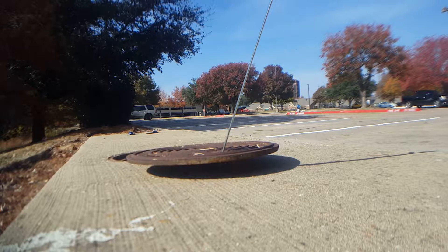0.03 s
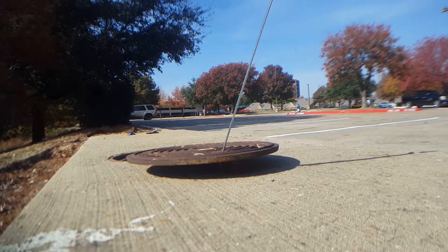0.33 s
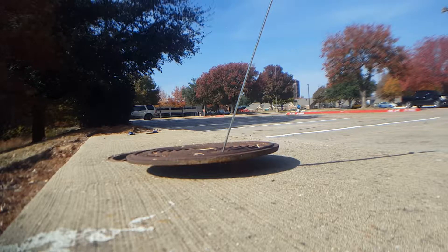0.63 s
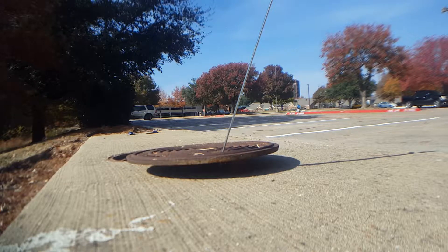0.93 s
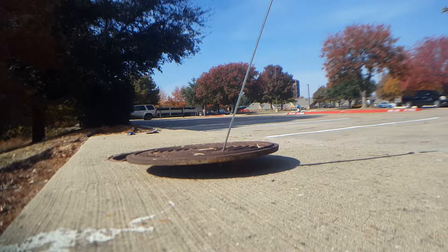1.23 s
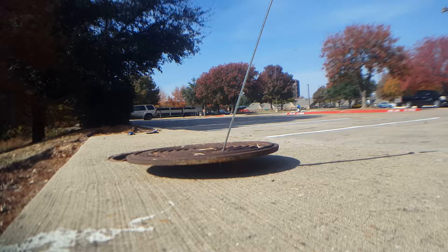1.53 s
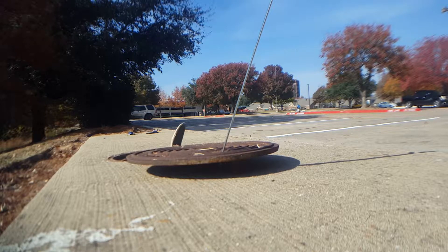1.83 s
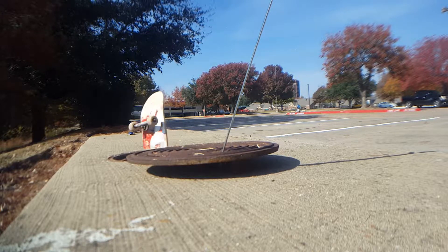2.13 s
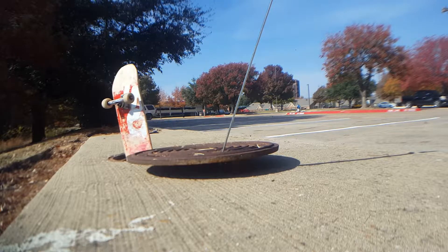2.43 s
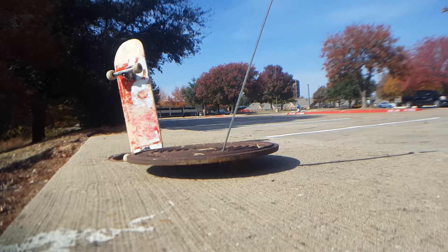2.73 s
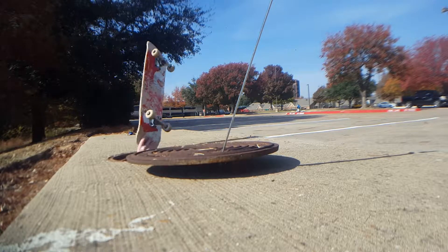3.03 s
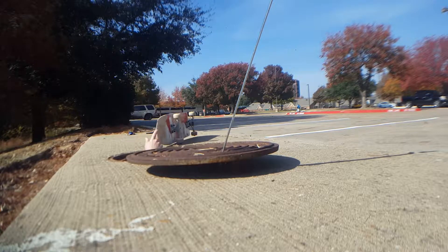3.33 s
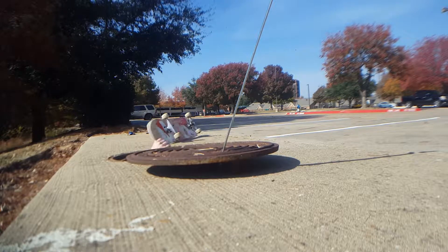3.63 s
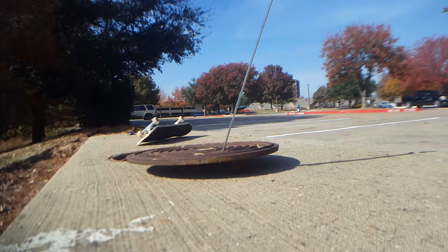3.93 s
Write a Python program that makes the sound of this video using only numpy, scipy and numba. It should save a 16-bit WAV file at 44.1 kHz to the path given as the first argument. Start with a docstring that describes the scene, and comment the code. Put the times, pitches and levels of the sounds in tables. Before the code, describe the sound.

Skateboard clattering onto pavement and a metal cover, over faint rolling wheels and distant traffic.

```python
"""Skateboard slam on concrete

Traffic rumbles far away, wheels roll up, and dull knocks and scuffs, likely steps, pass out of sight.
A skateboard is tipped up, knocks against an iron drain cover, slams down and clatters to rest.
Each hit rings the wooden deck and crushes grit; the slam also sets the iron ringing.
A small camera's automatic gain turns the sound down at the slam and recovers slowly."""
import sys
import numpy as np
from scipy import signal
from scipy.fft import rfft, irfft
from scipy.io import wavfile
from scipy.ndimage import uniform_filter1d
from numba import njit

SR = 44100
rng = np.random.default_rng(int(sys.argv[2]) if len(sys.argv) > 2 else 0)


def bounce(signal):
    """Save signal as a 16-bit WAV file at the path given by the first command-line argument."""
    frames = np.transpose(np.atleast_2d(signal))
    limited = np.clip(frames, -1, 1)
    pcm = np.round(limited * 32767).astype(np.int16)
    wavfile.write(sys.argv[1], SR, pcm)


N = 176400  # 4 seconds


def undb(db):
    """Turn decibels into a gain."""
    return 10 ** (np.asarray(db) / 20)


def unit(x):
    """Scale a sound to an energy of 1."""
    return x / np.sqrt(np.sum(x ** 2) + 1e-20)


def along_hz(points, size):
    """Join (f/Hz, value) points into a curve over the spectrum of `size` samples."""
    hz, value = np.array(points).T
    return np.interp(np.log(np.fft.rfftfreq(size, 1 / SR) + 1), np.log(hz + 1), value)


def colour(x, points):
    """Shape the tone by (f/Hz, level/dB) points, with a filter that never rings ahead of a hit."""
    cepstrum = irfft(np.log(undb(along_hz(points, size=4096))))
    half = len(cepstrum) // 2
    one_sided = np.r_[cepstrum[0], 2 * cepstrum[1:half], np.zeros(half)]
    response = irfft(np.exp(rfft(one_sided)))
    return signal.fftconvolve(x, response)[:len(x)]


def add(out, start_s, x):
    """Mix a sound in at a given time."""
    i = int(start_s * SR)
    out[i:i + len(x)] += x[:max(N - i, 0)]


def flutter(hz, depth_db):
    """A gain that drifts to a new random value `hz` times a second."""
    times = np.arange(0, N / SR + 1, 1 / hz)
    values = rng.standard_normal(N)[:len(times)]
    return undb(depth_db * np.interp(np.arange(N) / SR, times, values))


# How alike the two ears are: f/Hz, likeness (1 the same, 0 unrelated, -1 opposite)
EAR_LIKENESS = [(60, 1), (130, 0.95), (290, 0.91), (640, 0.5), (1410, -0.25), (3100, 0.26), (7000, -0.49),
                (15000, -0.16)]

def diffuse(tone):
    """Noise from all around, alike in both ears only in the bass."""
    alike = np.clip(along_hz(EAR_LIKENESS, size=N), -1, 1)
    shape = undb(along_hz(tone, size=N))
    mid = irfft(rfft(rng.standard_normal(N)) * shape * np.sqrt(1 + alike), N)
    side = irfft(rfft(rng.standard_normal(N)) * shape * np.sqrt(1 - alike), N)
    return np.array([mid + side, mid - side]) / np.std(mid)


# Tone of the far traffic: f/Hz, level/dB
TRAFFIC_TONE = [(12, -56), (20, -20), (76, -1.5), (133, -1), (175, -10.5), (274, -12.5), (324, -19),
                (362, -24.5), (465, -27), (505, -24.5), (631, -27.5), (767, -23.5), (1270, -27),
                (1380, -30.5), (1670, -26), (4190, -46.5), (15500, -63.5)]

def traffic():
    """Distant cars blur into one steady, low rumble."""
    return undb(-41.5) * diffuse(TRAFFIC_TONE)


# How loud the rolling is: t/s, rumble level/dB, hiss level/dB
ROLL_LEVELS = [(0, -43.5, -70), (.45, -46.5, -69), (.95, -47, -74.5), (1.15, -49, -67), (1.5, -47, -74),
               (2.25, -49, -76), (2.6, -47.5, -106), (2.85, -49, -71.5), (3.1, -44.5, -82), (4, -41.5, -73)]
# Tone of the wheel rumble: f/Hz, level/dB
RUMBLE_TONE = [(20, -41), (60, 7), (130, 6), (260, -1), (600, -6.5), (1500, -12.5), (4000, -64)]
# Tone of the grit hiss: f/Hz, level/dB
HISS_TONE = [(500, -12), (2000, -2.5), (4000, -15), (7000, -5.5), (9500, -16.5), (15000, -18)]

def wheels():
    """Wheels rumble on brushed concrete while grit hisses unevenly."""
    times, rumble_db, hiss_db = np.array(ROLL_LEVELS).T
    t = np.arange(N) / SR
    rumble = diffuse(RUMBLE_TONE) * undb(np.interp(t, times, rumble_db)) * flutter(hz=25, depth_db=1)
    hiss = diffuse(HISS_TONE) * undb(np.interp(t, times, hiss_db)) * flutter(hz=45, depth_db=1.2)
    return rumble + hiss


def ring(notes, t, scatter_db, detune):
    """A struck object rings with its own fading notes; strength and pitch can vary from hit to hit."""
    out = 0
    for k, (hz, db, ring_s) in enumerate(notes):
        strength, shift = rng.standard_normal(2)
        fade = np.exp(-np.log(1000) * t / ring_s)  # 60 dB down after ring_s
        wave = np.sin(2 * np.pi * hz * (1 + detune * shift) * t)
        out = out + (-1) ** k * undb(db + scatter_db * strength) * fade * wave
    return out


# Borders of a hit's five bands, low to high (thump, body, clack, edge, crack): f/Hz
BAND_EDGES = [130, 450, 1100, 2100, 4000, 17000]
# Tone of crushed grit: f/Hz, level/dB
GRIT_TONE = [(100, 5.5), (280, 0), (430, 1.5), (720, 6.5), (1050, -3), (1700, -3), (2200, -13),
             (2700, -10.5), (3300, -17.5), (4500, -22), (6800, -21.5), (8800, -29.5), (11000, -30.5),
             (15500, -39)]

def contacts(hits, notes, grit_db, rise_s):
    """Each hit rings an object and crushes grit, with a noisy crack in the top band. Stereo."""
    out = np.zeros((2, N))
    t = np.arange(SR // 4) / SR
    crack_rise_s, level_span_s = 0.0024, 0.03
    hit_gain = np.sqrt(level_span_s * SR)  # a band has the energy of its level held for this span
    bands = [signal.butter(3, edges, "band", fs=SR, output="sos")
             for edges in zip(BAND_EDGES, BAND_EDGES[1:])]
    for start_s, decay_s, *levels in hits:
        uneven = np.exp(.33 * np.repeat(rng.standard_normal(len(t)), 20)[:len(t)])  # grit is lumpy
        rough_fade = uneven * np.exp(-t / decay_s)
        grains = rng.standard_normal(len(t))
        crush = colour(grains * rough_fade * (1 - np.exp(-t / rise_s)), GRIT_TONE)
        # The notes shift because the object is supported differently at each hit.
        ringing = ring(notes, t, scatter_db=2.5, detune=.025)
        knock = unit(ringing) + undb(grit_db) * unit(crush)
        snap = rough_fade * (1 - np.exp(-t / crack_rise_s))
        for ear in out:
            own_grains = .55 * rng.standard_normal(len(t))  # reach this ear only
            crack = colour((grains + own_grains) * snap, GRIT_TONE)
            for band, db in zip(bands, levels):
                source = crack if band is bands[-1] else knock
                add(ear, start_s, unit(signal.sosfilt(band, source)) * undb(db) * hit_gain)
    return out


# Knocks and scuffs: t/s, grit decay/s, then level/dB in each of the five bands
KNOCK_HITS = [(0.023, 0.011, -36, -37, -53.5, -63, -66), (0.043, 0.011, -57, -40, -52.5, -68, -70),
              (0.138, 0.0055, -34, -36.5, -47.5, -57, -62), (0.151, 0.013, -31, -34.5, -46.5, -58, -62.5),
              (0.237, 0.02, -39.5, -45, -47.5, -62, -64.5), (0.335, 0.009, -43, -45, -50, -49.5, -57),
              (0.455, 0.035, -39.5, -66, -45.5, -48, -53.5), (0.469, 0.022, -43, -34.5, -45, -40, -50),
              (0.532, 0.013, -39.5, -40, -46, -49, -61.5), (0.7, 0.028, -45, -41.5, -51, -51.5, -60),
              (0.718, 0.026, -39.5, -37, -45, -57, -59.5), (0.82, 0.018, -38, -47, -59, -56, -65),
              (0.84, 0.032, -35, -39, -47, -55, -57.5), (0.873, 0.072, -52, -39, -51, -54.5, -65),
              (0.91, 0.012, -42.5, -48, -45, -51.5, -71), (1.022, 0.023, -52, -57, -61, -53, -68),
              (1.062, 0.06, -50, -50, -47.5, -52.5, -60.5), (1.087, 0.015, -43.5, -46.5, -46.5, -55.5, -77)]
# Dull notes of the knocks out of sight: f/Hz, level/dB, ring time/s
KNOCK_NOTES = [(174.6, -5.5, 0.27), (327, -5.5, 0.28), (432.3, -4.5, 0.2), (585.4, 5.5, 0.14),
               (674, -9.5, 0.18), (866, -5, 0.069), (1215, -9, 0.15), (1560, -15, 0.096),
               (2150, -11.5, .07), (3340, -15, 0.08)]
# Tone change for sounds out of sight: f/Hz, level/dB
HIDDEN_TONE = [(100, 0), (2500, 0), (4500, 1.5), (7500, 1), (10000, -4), (15500, -12)]

def hidden_knocks():
    """Knocks out of sight, likely shoes and the board being set down, lose their highest treble."""
    knocks = contacts(KNOCK_HITS, KNOCK_NOTES, grit_db=0, rise_s=0.00085)
    return np.array([colour(ear, HIDDEN_TONE) for ear in knocks])


# Notes of the iron cover: f/Hz, level/dB, ring time/s
IRON_NOTES = [(118, -8, .5), (184, 5, .16), (285, 0, .4), (525, -9, .3), (722, 0, .25), (945, -3, .28),
              (1147, -2, .34), (1464, 0, .26), (1612, 1, .27), (1680, 2, .24), (1735, -2, .27),
              (1897, -5, .27), (2030, -1, .25), (2240, -10, .3), (2597, -8, .17)]

def drain_cover():
    """The iron cover rings on after the board's hardest hit."""
    slam_s = 3.320
    ringing = ring(IRON_NOTES, np.arange(SR) / SR, scatter_db=1, detune=0)
    out = np.zeros(N)
    add(out, slam_s, undb(-15) * ringing)
    return out


# Hits of the board: t/s, grit decay/s, then level/dB in each of the five bands
BOARD_HITS = [(2.3292, 0.014, -24, -25.5, -34.5, -70, -50.5), (2.3427, 0.01, -28, -25.5, -30, -63, -38),
              (2.3782, 0.0096, -52, -60, -63, -50, -53.5), (2.4962, 0.019, -35.5, -34, -37, -76, -48.5),
              (2.5082, 0.0074, -77, -41, -72, -61, -71), (2.5312, 0.003, -87, -39, -69, -64, -63),
              (2.6685, 0.0097, -26, -23.5, -32.5, -53, -38), (2.6952, 0.011, -42, -36, -43.5, -50.5, -48.5),
              (2.7122, 0.0098, -36, -33.5, -50, -60, -62), (2.7242, 0.036, -45.5, -38.5, -45, -58, -63),
              (3.1537, 0.016, -33, -37.5, -36.5, -65, -50), (3.2432, 0.036, -39, -43.5, -45.5, -56, -57),
              (3.2747, 0.01, -31, -31, -31, -44, -43.5), (3.3135, 0.0042, -34, -30, -21.5, -54, -75),
              (3.318, 0.012, -14.5, -11, -9.5, -15, -19), (3.3332, 0.0063, -18.5, -20, -13, -21.5, -40),
              (3.3492, 0.03, -23, -20, -27, -24, -30.5),
              (3.3732, 0.0058, -19.5, -15.5, -17.5, -27.5, -38.5),
              (3.4032, 0.025, -22.5, -25, -23, -36, -45), (3.4542, 0.01, -32.5, -31.5, -27, -42.5, -51),
              (3.5562, 0.015, -33, -30, -34, -60, -53), (3.5712, 0.011, -35.5, -38, -32, -77, -68),
              (3.6732, 0.041, -37.5, -40.5, -41.5, -52.5, -66),
              (3.7602, 0.01, -40.5, -37, -37.5, -53.5, -60), (3.7822, 0.03, -46, -41.5, -37.5, -65, -54.5),
              (3.8422, 0.011, -39, -35, -43, -49, -50), (3.8502, 0.021, -56, -34.5, -35.5, -47.5, -46),
              (3.9307, 0.01, -25.5, -23.5, -28.5, -41, -50), (3.9632, 0.008, -50, -74, -40.5, -53, -58.5)]
# Notes of the plywood deck with its axles: f/Hz, level/dB, ring time/s
DECK_NOTES = [(167, -6.5, 0.066), (269.6, -3.5, .12), (338.8, -2.5, 0.11), (559, 2.5, 0.11),
              (676.5, 8, 0.057), (766, 5, 0.087), (938, 0, 0.068), (1077, -8.5, 0.087), (1249, -8.5, 0.098),
              (1374, -3.5, 0.068), (1437, 1.5, 0.023), (1615, -5.5, 0.02), (1807, -17.5, 0.14),
              (2071, -15.5, 0.034), (2600, -10, 0.017)]

def skateboard():
    """The wooden deck rings at each sharp hit as it tips, slams down and clatters to rest."""
    return contacts(BOARD_HITS, DECK_NOTES, grit_db=-1, rise_s=0.0002)


# How far the wave is ahead in the left ear: f/Hz, phase/rad
LEFT_EAR_LEAD = [(20, 0), (300, .15), (1000, .55), (2500, 1.15), (4000, 1.9), (8000, 1.6), (15000, 1.4)]
# How much louder the left ear is than the right: f/Hz, level/dB
LEFT_EAR_BOOST = [(100, 0), (400, -.5), (2400, -.5), (4400, 3), (6000, 2), (8000, -3), (15000, -3.5)]
# Tone of the echo: f/Hz, level/dB
ECHO_TONE = [(100, -2.5), (300, -1.5), (800, 3.5), (1800, 0), (3500, -5), (8000, -9.5), (15000, 5.5)]

def open_lot(x):
    """Sound arrives a little from the left, followed by a thin echo from trees and kerbs."""
    echo_rise_s, echo_ring_s, echo_db = .01, 0.88, -17.5
    lead = np.exp(1j * along_hz(LEFT_EAR_LEAD, size=N))
    pan = undb(along_hz(LEFT_EAR_BOOST, size=N) / 2)
    direct = irfft(rfft(x) * np.array([pan * lead, 1 / pan]), N)
    t = np.arange(SR) / SR
    fade = (1 - np.exp(-t / echo_rise_s)) ** 2 * np.exp(-np.log(1000) * t / echo_ring_s)
    tails = [unit(noise[:SR] * fade) for noise in diffuse(ECHO_TONE)]
    echo = np.array([signal.fftconvolve(ear, tail)[:N] for ear, tail in zip(x, tails)])
    return direct + undb(echo_db) * echo


def scene():
    """Board, dull knocks and iron sound in the open lot, over rolling wheels and far traffic."""
    return open_lot(skateboard() + hidden_knocks() + drain_cover()) + wheels() + traffic()


@njit
def follow(loudness, attack, release):
    """Track the loudness, rising at the attack rate and falling at the release rate."""
    out, level = np.empty(len(loudness)), 0.
    for i in range(len(loudness)):
        level += (loudness[i] - level) * (attack if loudness[i] > level else release)
        out[i] = level
    return out


def record(dry):
    """Automatic gain dips at the slam, the highest peaks clip, and the very top treble is cut."""
    threshold, top_hz = 0.24, 15750
    average_s, attack_s, release_s = 0.0064, 0.0031, 0.8
    power = uniform_filter1d(np.mean(dry ** 2, axis=0), int(average_s * SR))
    level = follow(np.sqrt(np.abs(power)), 1 / (attack_s * SR), 1 / (release_s * SR))
    gain = threshold / np.maximum(level, threshold)
    clipped = np.clip(dry * gain, -1, 1)
    return signal.sosfilt(signal.ellip(8, .2, 70, top_hz, fs=SR, output="sos"), clipped)


dry = scene()
out = record(dry)
bounce(out)
```